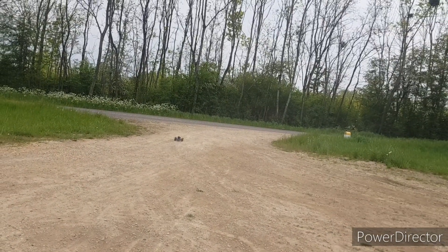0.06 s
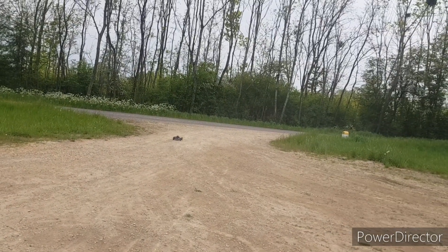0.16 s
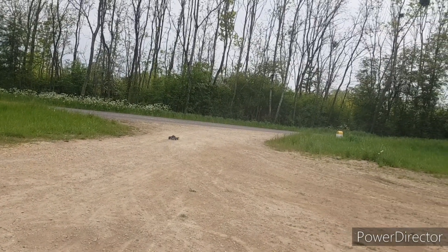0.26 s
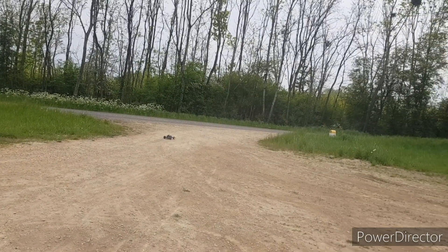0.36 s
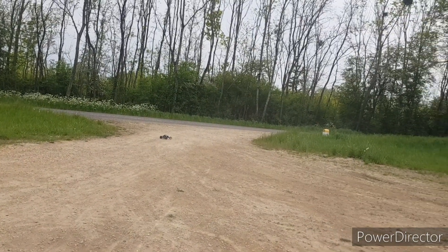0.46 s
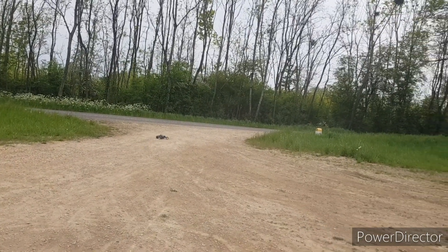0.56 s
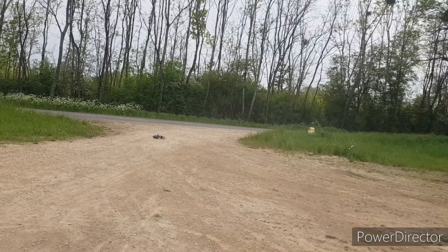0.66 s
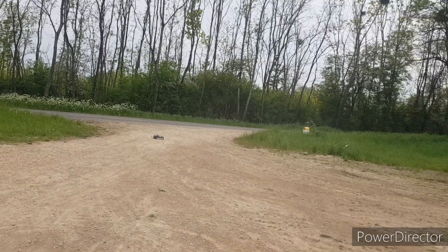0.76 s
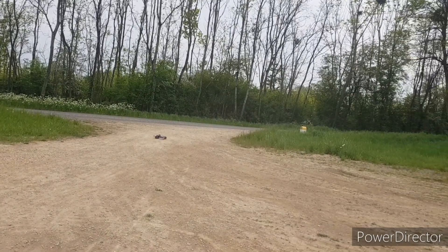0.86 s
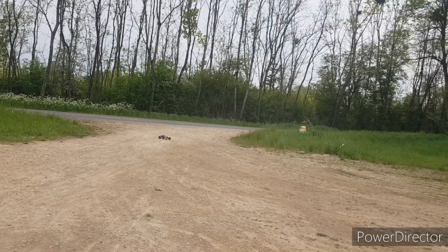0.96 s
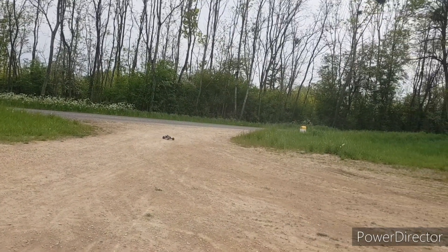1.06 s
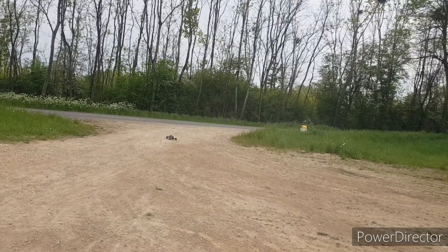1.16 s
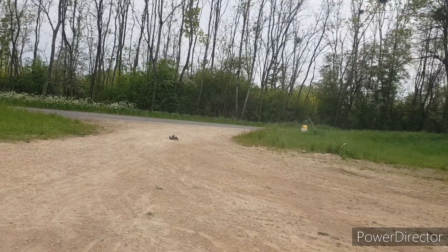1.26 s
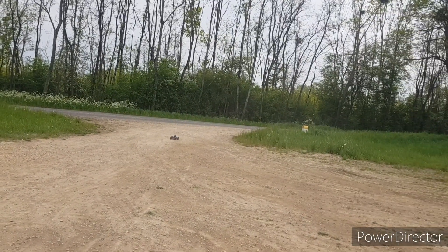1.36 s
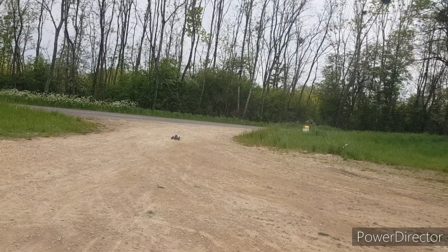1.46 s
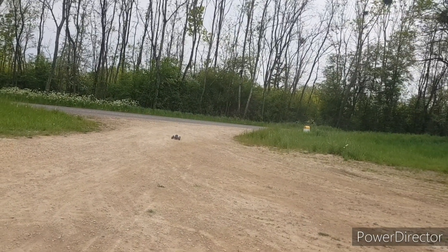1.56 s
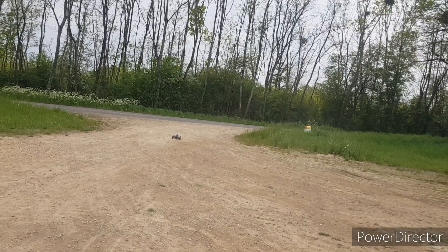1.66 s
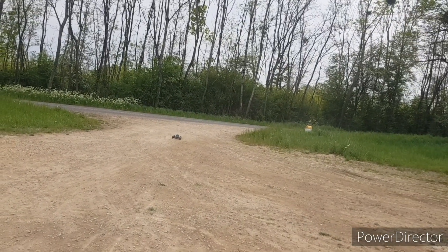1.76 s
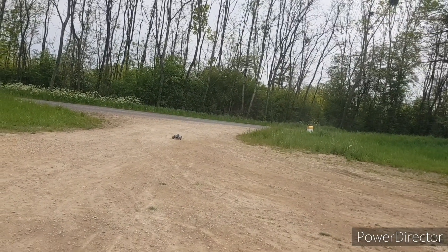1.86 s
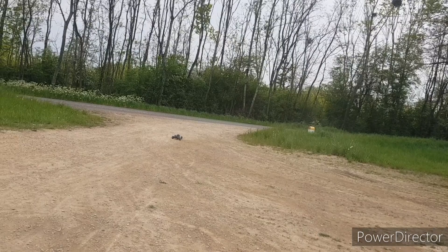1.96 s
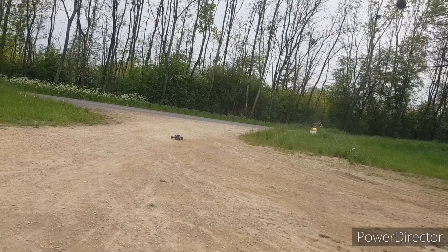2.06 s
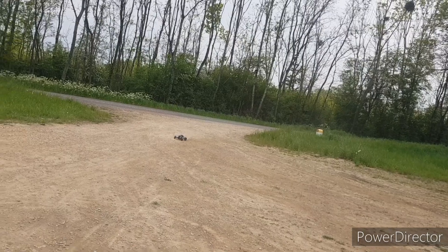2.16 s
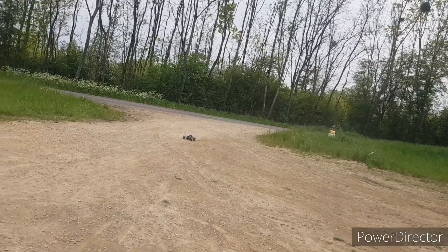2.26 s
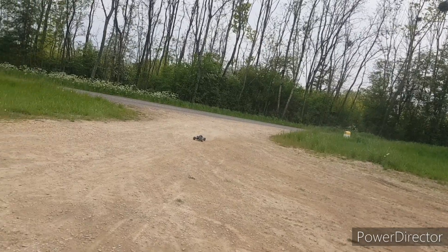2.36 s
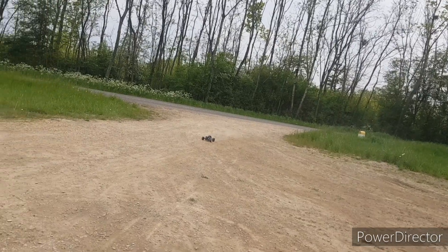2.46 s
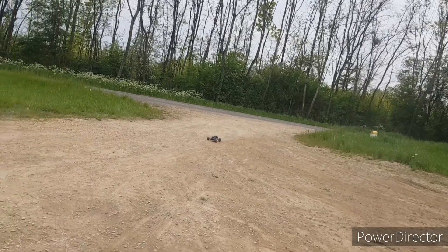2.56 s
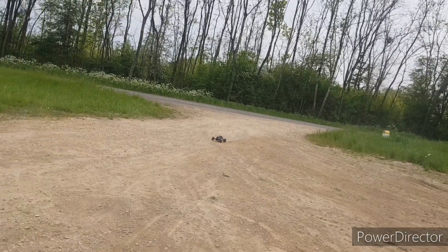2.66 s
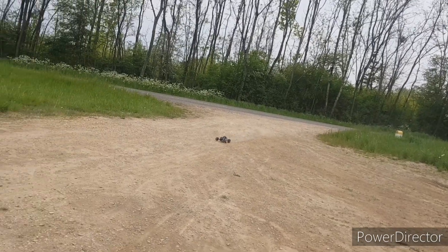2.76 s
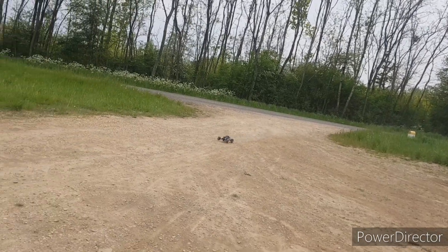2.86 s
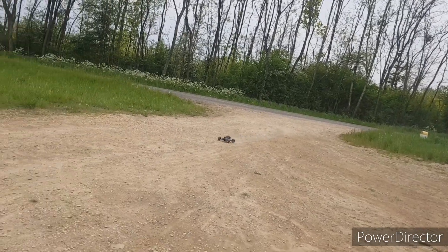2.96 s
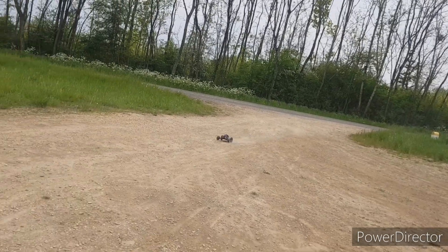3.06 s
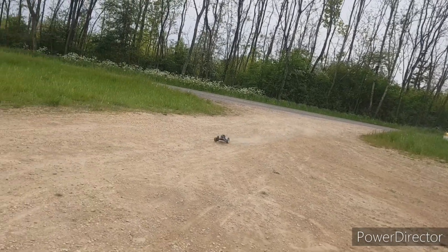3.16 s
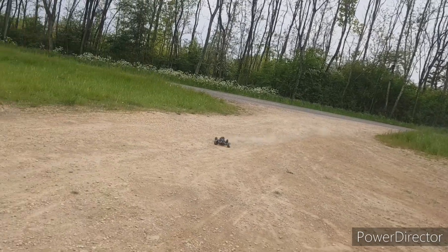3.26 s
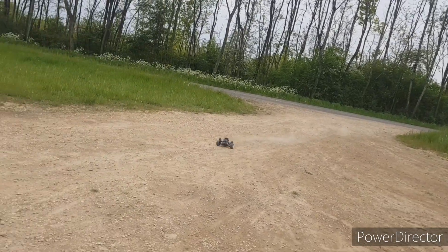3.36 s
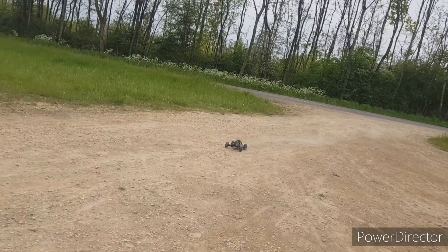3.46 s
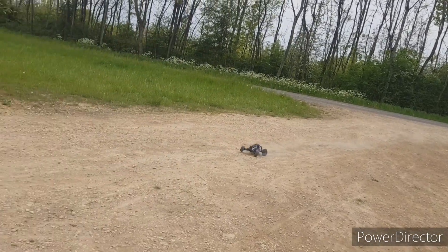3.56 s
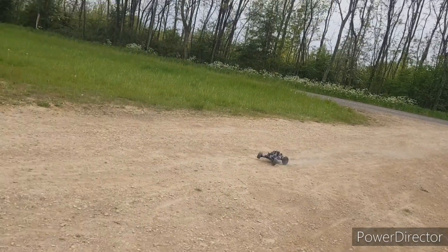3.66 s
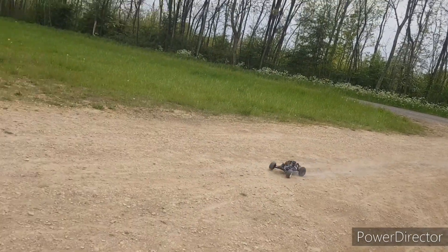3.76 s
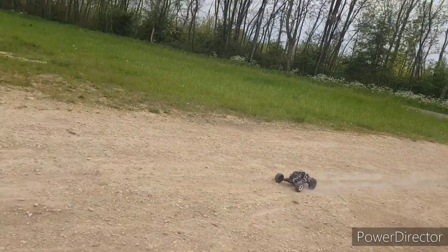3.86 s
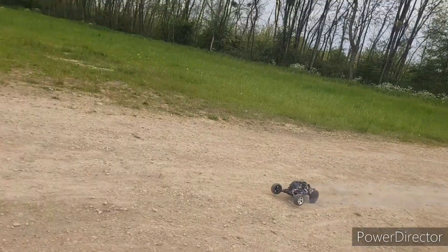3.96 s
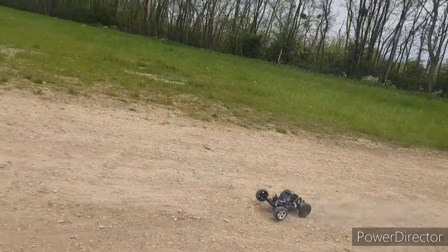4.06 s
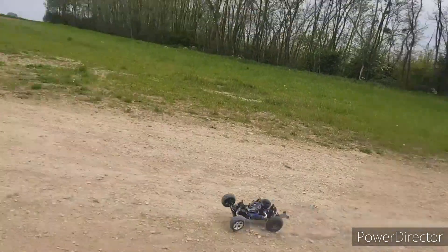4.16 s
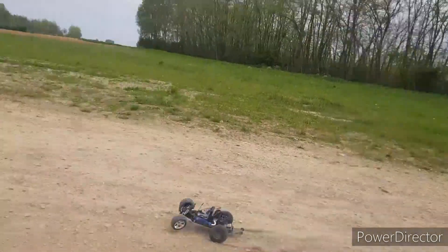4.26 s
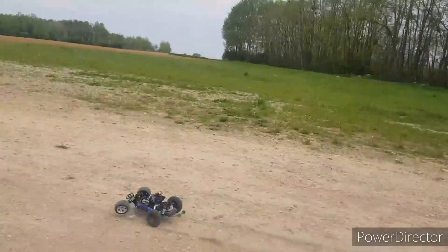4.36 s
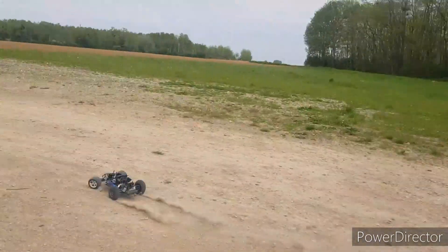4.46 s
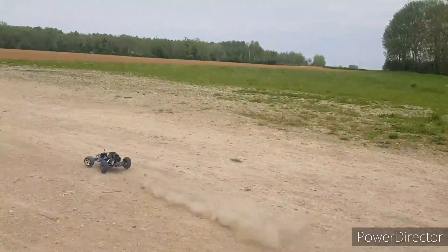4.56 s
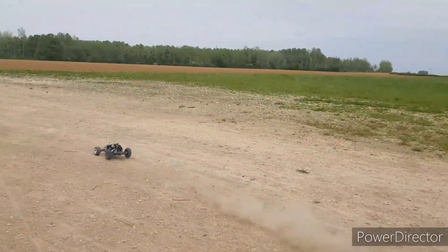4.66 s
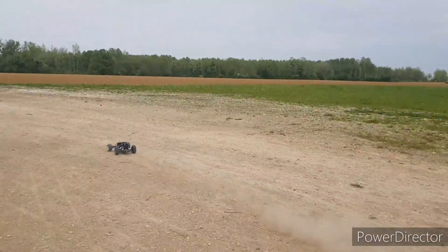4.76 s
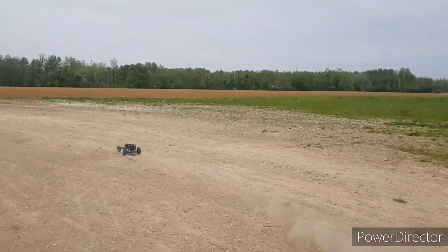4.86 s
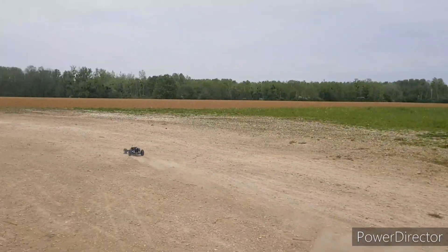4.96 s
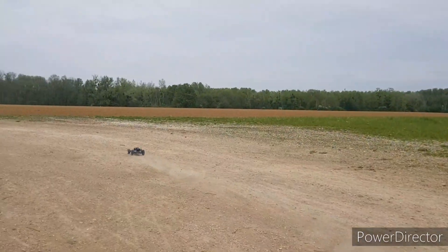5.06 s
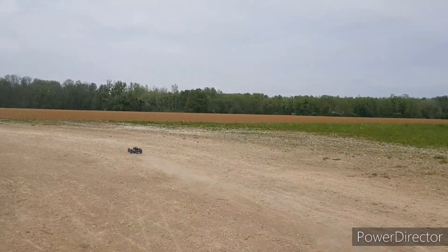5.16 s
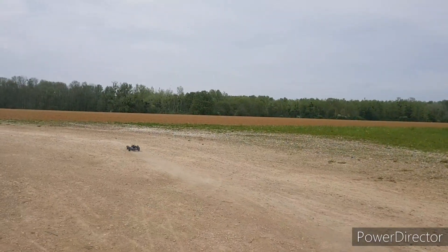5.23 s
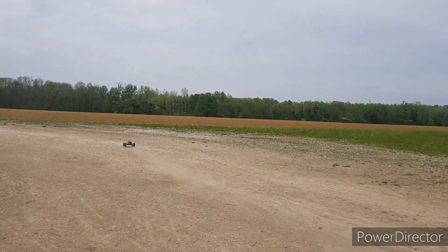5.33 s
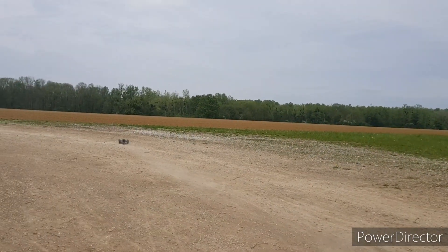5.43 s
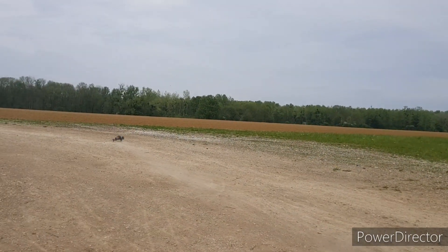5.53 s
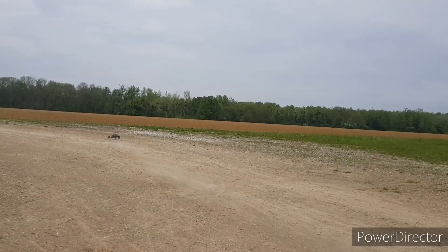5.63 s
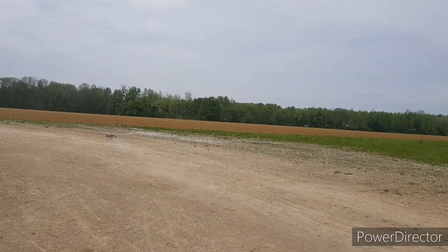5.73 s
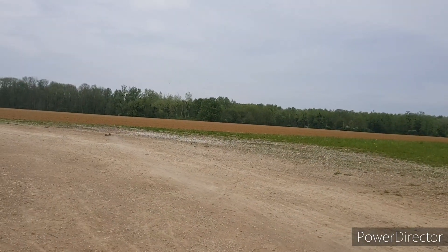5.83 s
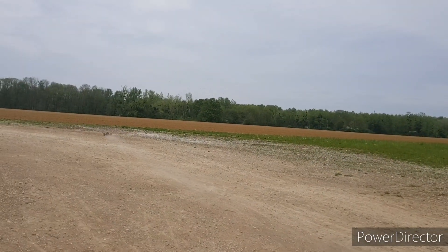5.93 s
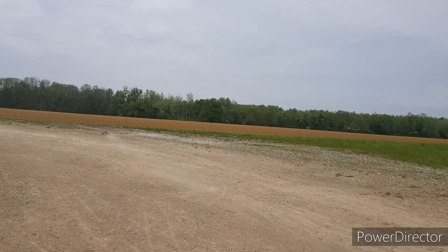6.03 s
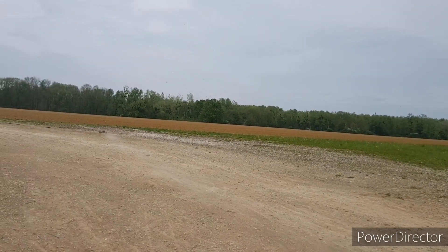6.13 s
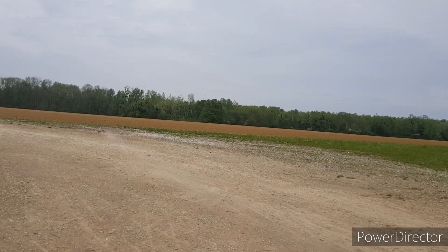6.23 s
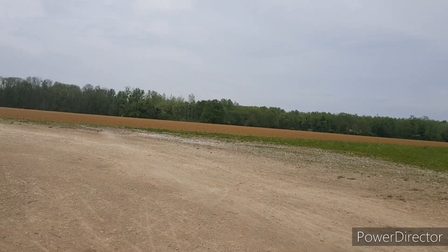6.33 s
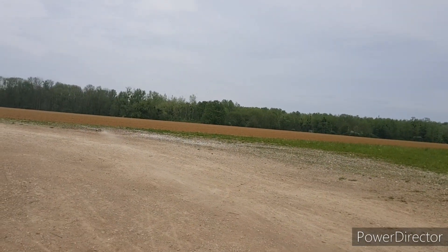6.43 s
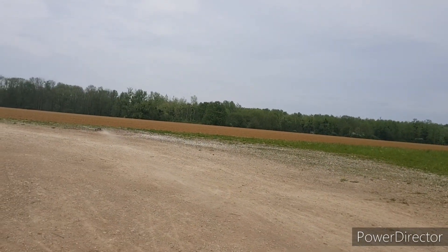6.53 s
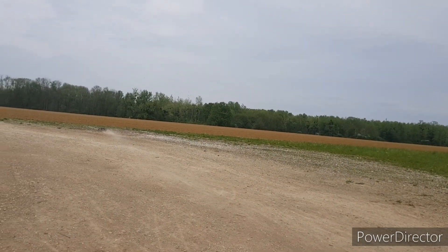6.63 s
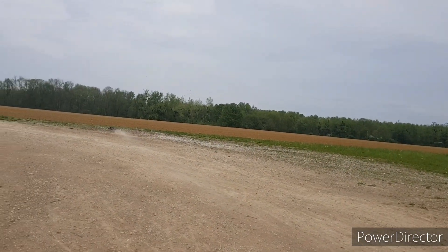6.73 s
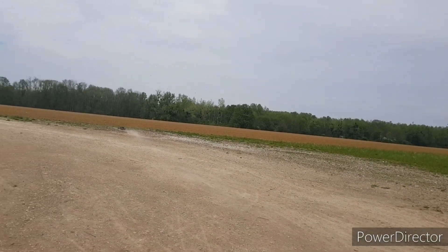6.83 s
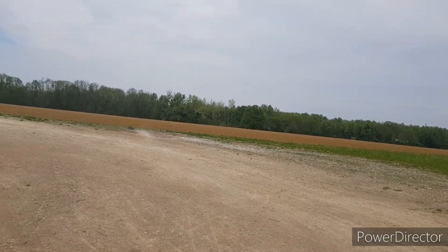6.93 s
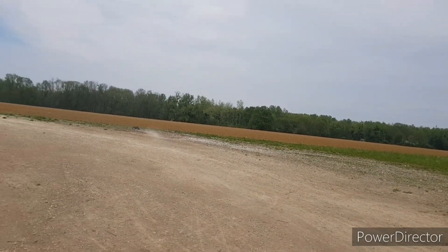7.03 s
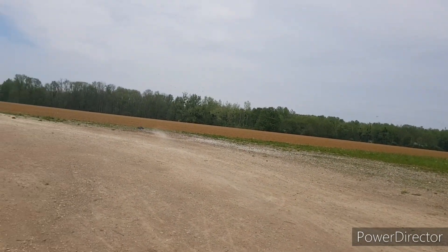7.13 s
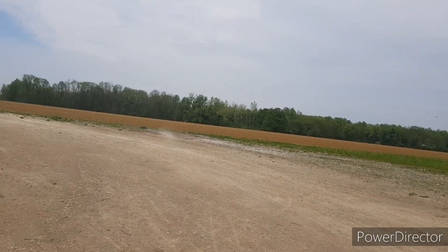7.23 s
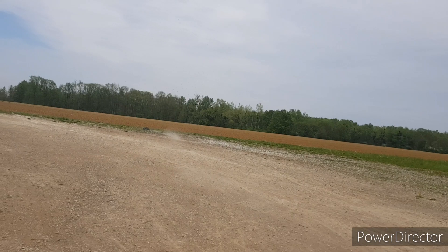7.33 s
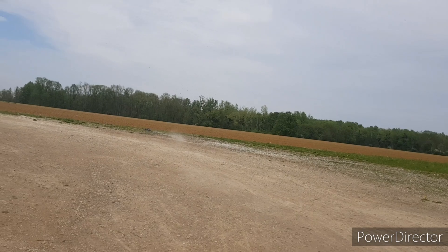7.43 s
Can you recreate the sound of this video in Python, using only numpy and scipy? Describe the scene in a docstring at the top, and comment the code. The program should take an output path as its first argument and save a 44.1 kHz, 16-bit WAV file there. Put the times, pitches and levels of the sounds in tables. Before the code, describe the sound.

A tiny two-stroke engine idles at a distance on open gravel, raspy and hissing, with a few short throttle blips. It then revs hard, its buzzy scream wobbling as wheels slip and bounce, body clattering and thudding as it passes close. It recedes, drops to a faint idle, and grit and small stones tick down near the microphone. Light wind rumbles softly throughout.

```python
"""A small two-stroke model car idles on gravel under light wind, blips its throttle, then races past in bursts.
Each turn of the shaft fires once into a tuned pipe: overtones of the firing rate, with gas hissing in puffs.
On the bursts the wheels slip and bounce, so the speed wobbles; the body clatters and a thin whistle comes and goes.
At last the car idles far off while grit, sand and small stones thrown up by the tyres tick down.
Throughout, the land murmurs and wind rumbles at two microphone ports, which hear the car with unlike delay and colour."""
import sys
import numpy as np
from scipy import signal
from scipy.fft import rfft, irfft
from scipy.io import wavfile
from scipy.ndimage import uniform_filter1d, map_coordinates

SR = 44100
rng = np.random.default_rng(int(sys.argv[2]) if len(sys.argv) > 2 else 0)


def wav_record(signal):
    """Record a signal, one row per channel, as 16-bit PCM in the file named by sys.argv[1]."""
    frames = np.transpose(np.atleast_2d(signal))
    bounded = np.clip(frames, -1, 1)
    # unit amplitude maps onto the largest positive 16-bit level
    quanta = np.round(bounded * 32767).astype(np.int16)
    wavfile.write(sys.argv[1], SR, quanta)


N = 330309
TIME = np.arange(N) / SR  # s
IDLE_HZ = 200  # speed at which the voices have their idle level

# response of each engine voice: (level/dB per octave of speed, level/dB at full throttle, loss/dB when coasting)
THUMP, PIPE = (5.43, 1.7, 14), (11.83, 7.43, 10)
PIPE_END, INTAKE = (8.9, 5.7, 12), (9.9, 7.28, 0.062)

# the car comes and goes: t/s, level of intake and casing at idle/dB, chassis clatter between landings/dB
PASSAGE = [(0, -45.5, -52.5), (.35, -46, -56.5), (.65, -46.5, -55), (.8, -42, -51), (1, -43, -49.5),
           (1.28, -43.5, -50), (1.6, -43, -45.5), (1.83, -42, -47), (2, -38.5, -36.5), (2.18, -43.5, -36),
           (2.28, -43.5, -43.5), (2.48, -45.5, -47), (2.75, -40.5, -43), (3, -41.5, -37),
           (3.25, -43.5, -35.5), (3.4, -38, -36.5), (3.48, -44, -39.5), (3.7, -43, -32.5), (4, -40, -30.5),
           (4.18, -37.5, -31), (4.3, -37.5, -32.5), (4.42, -35, -29.5), (4.55, -39.5, -32),
           (4.66, -37.5, -35.5), (4.74, -41, -48), (4.9, -45, -38), (5.12, -47, -39), (5.25, -45.5, -46),
           (5.38, -47.5, -47.5), (5.5, -51.5, -59.5), (5.6, -49, -51), (5.7, -52.5, -58.5), (6, -53, -56),
           (6.2, -55, -59), (6.4, -58, -63), (6.8, -57.5, -68.5), (7.49, -55, -65.5)]
# wheels landing: t/s, starting level/dB, f/Hz
LANDINGS = [(2.222, -34, 253.4), (3.025, -32, 105.4), (3.197, -28, 209.7), (3.301, -41, 183.9),
            (3.418, -34, 237.8), (3.604, -28, 188), (3.671, -28, 185), (3.817, -37, 241.2),
            (3.991, -35, 180.6), (4.187, -29, 220), (4.276, -37, 198.1), (4.358, -46, 288.4),
            (4.639, -30, 298.6), (4.955, -45, 214.2), (5.014, -46, 259.9), (5.098, -34.5, 217.8)]
# part of pipe and casing that faces the ports: t/s, ring f/Hz, bright band f/Hz, its lift/dB,
# hollow from the ground echo f/Hz, its depth/dB
FACING_PARTS = [(0, 2550, 4000, -1, 3300, -0.5), (.25, 2550, 3600, 4, 3200, 1.5),
                (.5, 2550, 3750, 4, 3200, 2), (.65, 2550, 4200, 1.5, 3300, 1),
                (1.0, 2550, 5200, 6, 3320, 4), (1.6, 2550, 4850, 2, 3302, 1.5),
                (2.0, 2550, 4395, 0, 3273, 1), (2.3, 2310, 4200, -5, 3200, 7),
                (2.45, 2330, 4200, 2, 3270, 7), (2.62, 2425, 4280, 3, 3300, 8),
                (2.82, 2489, 4405, -3, 3350, 2), (2.95, 2694, 5903, 2, 3600, 4),
                (3.15, 2608, 5795, 3, 3706, 2), (3.35, 2391, 4600, 2.5, 3306, 0),
                (3.6, 2607, 5800, 1, 3708, -6), (3.9, 2476, 5754, 5, 3191, 7),
                (4.1, 2480, 5050, 3.5, 3030, 5), (4.22, 2508, 4400, 8, 2988, 6.5),
                (4.35, 2753, 4464, 0.5, 3394, 0.5), (4.43, 2502, 4420, 8, 3296, 0),
                (4.5, 2505, 4750, 5, 2923, 0), (4.58, 2598, 5810, 6, 3295, -0.5),
                (4.75, 2550, 5505, 8, 3030, 1), (4.88, 2597, 4465, 3, 3220, 3),
                (5.0, 2700, 4647, 3, 3390, 4.5), (5.13, 2630, 4500, 3, 3300, 3),
                (5.25, 2583, 5003, 5, 3005, 3), (5.4, 2503, 4405, 3, 3004, -3),
                (5.7, 2550, 4792, 2.5, 3303, 5), (7.49, 2550, 4806, 4.5, 3288, 4.5)]


def gain_of(db):
    """Logarithmic level: decibels to an amplitude factor."""
    return 10 ** (np.asarray(db) / 20)


def evened(x):
    """Power normalisation: scales to a mean square of 1."""
    return x / np.sqrt(np.mean(x ** 2) + 1e-20)


def read(points, hz, axis=1):
    """Linear interpolation of a table column over log frequency."""
    table = np.transpose(points)
    return np.interp(np.log(hz + 1), np.log(table[0] + 1), table[axis])


def curve(rows, t, axis=1):
    """Linear interpolation of a table column over time."""
    table = np.transpose(rows)
    return np.interp(t, table[0], table[axis])


def hump(t, s, half_s):
    """Raised-cosine pulse: a peak of height 1 with rounded top and feet."""
    return np.cos(np.pi / 2 * np.clip((t - s) / half_s, -1, 1)) ** 2


def drift(shape, size):
    """Low-passed noise: smooth chance of spread 1 along the last axis."""
    smoothed = uniform_filter1d(rng.standard_normal(shape), size)
    return evened(uniform_filter1d(smoothed, size))


def reshaped(x, factor):
    """Time-varying filtering: multiplies short-time spectra by factor(Hz column, seconds row)."""
    hz, t, z = signal.stft(x, SR, nperseg=512, noverlap=384)
    return signal.istft(z * factor(hz[:, None], t), SR, nperseg=512, noverlap=384)[1][..., :N]


def coloured(noise, spectrum):
    """Stationary linear filtering: weights the whole spectrum of a noise by a table of levels."""
    return irfft(rfft(noise) * gain_of(read(spectrum, np.fft.rfftfreq(N, 1 / SR))), N)


def field():
    """Stationary filtered noise: the steady low murmur of the open land."""
    # spectrum of the murmur: f/Hz, relative level per Hz/dB
    murmur_spectrum = [(100, -14), (150, 14), (300, 1.5), (450, 0), (800, -6.5), (1500, -41)]
    level_db = -58
    return gain_of(level_db) * evened(coloured(rng.standard_normal(N), murmur_spectrum))


def wind(lumps_db=4.5):
    """Turbulent pressure at a port: low lumpy noise, mostly independent at each."""
    # slow swell: t/s, level/dB
    swell = [(0, -53), (.8, -55), (1.4, -44), (1.85, -55), (2.7, -47), (3.2, -51.5), (3.6, -52), (4.1, -59),
             (4.9, -62.5), (5.6, -65), (6.2, -58.5), (6.4, -61.5), (6.9, -53.5), (7.49, -53.5)]
    # gusts added to the swell: t/s, peak of the added level/dB, half length/s
    puffs = [(1.257, -71, 0.045), (1.583, -45, 0.064), (2.903, -34, 0.062), (4.207, -42, 0.056),
             (4.361, -43, 0.14), (4.644, -46, 0.11), (5.283, -53, 0.06), (5.442, -62, 0.059),
             (6.968, -51, 0.068), (7.26, -47, 0.073)]
    # spectrum of the rumble: f/Hz, relative level per Hz/dB
    rumble_spectrum = [(20, -32), (30, -19), (40, -13), (55, -2), (75, -6.5), (110, -12.5), (170, -17),
                       (300, -24), (500, -68)]
    shared = .4  # amplitude of the part common to both ports
    push = rng.standard_normal((3, N)) * gain_of(lumps_db * drift((3, N), size=2500))
    push = push[:2] + shared * push[2]
    gusts = sum(gain_of(db) * hump(TIME, s, half_s) for s, db, half_s in puffs)
    return evened(coloured(push, rumble_spectrum)) * (gain_of(curve(swell, TIME)) + gusts)


def sand(per_s=110):
    """Shot noise: fine grains patter down as faint ticks of chance size and time, stronger at one port."""
    # peak of the faintest tick at its nearer port: t/s, level/dB
    patter = [(5.3, -70), (5.6, -51), (6.2, -52), (6.7, -59), (7.49, -66)]
    t = np.arange(-12, 24) / SR
    tick = np.exp(-abs(t) / .00007) * np.cos(2 * np.pi * 10500 * t)
    sizes = gain_of(2.69 * np.minimum(rng.exponential(1, (2, N)), 3))
    falls = (rng.random((2, N)) < per_s / SR) * sizes
    both_ports = falls + .5 * falls[::-1]
    return signal.oaconvolve(both_ports, tick[None], "same") * gain_of(curve(patter, TIME))


def grit(cycles=0.34, skitter_db=-9):
    """Impact excitation: each grain is a strongly damped tick followed by a brief decaying skitter."""
    # grains: t/s, peak level/dB, left minus right level/dB, f/Hz, skitter decay time/s (at least 1e-4 s)
    grains = [(5.6062, -32, -8, 7000, .0006), (5.6401, -43, -2, 9000, .0006), (5.6884, -37, -5, 7000, .001),
              (5.852, -37, -4, 9500, .0025), (5.8892, -42, -6, 6500, .002), (5.9197, -40, -6, 8500, .002),
              (5.9795, -36, -6, 10500, .001), (5.9977, -43, -5, 9000, .0006), (6.0791, -38, -7, 6000, .002),
              (6.132, -39, -6, 4500, .001), (6.1649, -37, -2, 7000, .001), (6.1754, -41, -3, 8000, .001),
              (6.2257, -41, -5, 10000, .0015), (6.3344, -43, -3, 9990, .0008),
              (6.3894, -46, -5, 9500, .0006), (6.4882, -48, -3, 9500, .0006), (6.5164, -43, -4, 7510, .001)]
    out, t, after = np.zeros((2, N)), np.arange(-30, 60) / SR, np.arange(500) / SR
    chance = rng.standard_normal((len(grains), len(after)))
    for (s, db, pan_db, hz, skitter_s), jumps in zip(grains, chance):
        tick = np.exp(-abs(t) * hz / cycles) * np.cos(2 * np.pi * hz * t)
        skitter = gain_of(skitter_db) * jumps * np.exp(-after / max(skitter_s, 1e-4))
        grain = np.convolve((after == 0) + skitter, tick)
        pan = gain_of([[pan_db / 2], [-pan_db / 2]])
        sound = gain_of(db) * grain / abs(grain).max() * pan
        at = round((s + t[0]) * SR)
        out[:, at:at + sound.shape[1]] += sound
    return out


def thuds(rows, t60, rise_s):
    """Free decay of a struck mode: one exponentially damped tone for each impact."""
    out, t = np.zeros(N), np.arange(4000) / SR
    for s, db, hz in rows:
        thud = gain_of(db - 60 * t / t60) * np.sin(2 * np.pi * hz * t) * np.minimum(t / rise_s, 1)
        out[round(s * SR):round(s * SR) + len(t)] += thud
    return out


def stones():
    """Impact resonance: larger stones drop with short, quickly damped tones."""
    # stones dropping: t/s, starting level/dB, f/Hz
    drops = [(5.588, -35, 540), (6.016, -46, 720.4), (6.118, -43, 751), (6.286, -45, 649),
             (6.366, -42, 650), (6.42, -43, 701)]
    return thuds(drops, t60=0.022, rise_s=0.0009)


def landings():
    """Impact resonance: wheels meet the ground with longer, low damped tones."""
    return thuds(LANDINGS, t60=0.068, rise_s=0.002)


def chassis():
    """Random impact excitation: plastic body and wheels knock over the gravel, in lumps."""
    # spectrum of the clatter: f/Hz, relative level per Hz/dB
    clatter_spectrum = [(60, -49), (150, 0.5), (250, -6), (400, -5), (650, 6.5), (1000, -3), (1500, -4),
                        (1900, -1), (2600, -57)]
    bumps_db, knock_db = 1.8, 2.5  # spread of the lumps and of the knocks
    kick_db, kick_s = 3.5, 0.018  # each landing rattles the body: rise in level, half length
    lumps = gain_of(bumps_db * drift(N, size=700)) * rng.standard_normal(N)

    def colour(hz, t):
        """Spectral weighting: short hollow knocks of chance pitch upon the clatter spectrum."""
        knocks = evened(uniform_filter1d(drift((len(hz), len(t)), size=5), size=3, axis=0))
        return gain_of(read(clatter_spectrum, hz) + knock_db * knocks)

    kicks = sum(hump(TIME, row[0], kick_s) for row in LANDINGS)
    level_db = curve(PASSAGE, TIME, axis=2) + kick_db * kicks
    return evened(reshaped(lumps, colour)) * gain_of(level_db)


def whistle(waver_hz=39.0):
    """Frequency modulation: chance wavering makes a high tone fuzzy, perhaps the clutch at part throttle."""
    # the tone: t/s, mean f/Hz, level/dB
    tone = [(1.15, 10630, -85), (1.22, 10860, -60), (1.5, 10800, -59), (1.8, 11090, -64),
            (1.95, 11200, -85), (2.3, 10600, -83), (2.42, 10990, -54), (2.6, 11290, -70),
            (2.85, 11320, -53), (2.95, 11650, -85)]
    turns = np.cumsum(curve(tone, TIME) + waver_hz * drift(N, size=300)) / SR
    return np.sqrt(2) * gain_of(curve(tone, TIME, axis=2)) * np.sin(2 * np.pi * turns)


def speed_at(t):
    """Load on a rotating shaft: firing rate in Hz, with jolts from the wheels."""
    # engine speed before the jolts, one firing a turn: t/s, f/Hz
    speeds = [(0.0, 199.1), (0.356, 195.1), (0.378, 198), (0.608, 193.3), (0.65, 196.8), (0.738, 195.8),
              (0.82, 249.8), (0.857, 246.8), (0.917, 204.9), (1.104, 191.3), (1.162, 188.4), (1.215, 230),
              (1.272, 224), (1.33, 200), (1.454, 223), (1.816, 228.1), (1.889, 295.1), (1.968, 320.6),
              (2.041, 398.8), (2.097, 418.7), (2.152, 391.3), (2.219, 259.8), (2.306, 196), (2.36, 226),
              (2.392, 235.6), (2.452, 233.3), (2.508, 224.2), (2.576, 249.5), (2.62, 258.9), (2.7, 254.7),
              (2.85, 260.1), (2.878, 309.4), (2.946, 335), (3.022, 456.3), (3.077, 431.7), (3.105, 355.4),
              (3.139, 351.2), (3.204, 367), (3.245, 422.8), (3.285, 418.6), (3.362, 335), (3.45, 203.8),
              (3.498, 227.6), (3.534, 322.4), (3.555, 328.4), (3.6, 379.2), (3.666, 481.5), (3.776, 439.5),
              (3.804, 426.3), (3.826, 472.7), (3.876, 501.5), (3.93, 467.7), (3.954, 468), (3.978, 512),
              (4.01, 490.6), (4.04, 428), (4.072, 499.3), (4.1, 512), (4.126, 510.3), (4.166, 428.8),
              (4.19, 361.3), (4.206, 388), (4.246, 485.3), (4.276, 517), (4.302, 497.5), (4.348, 570.6),
              (4.362, 568.6), (4.382, 505.4), (4.404, 490), (4.436, 436), (4.478, 493), (4.51, 507),
              (4.55, 568.6), (4.572, 527.4), (4.588, 466), (4.612, 436), (4.66, 287), (4.764, 257.8),
              (4.797, 282.8), (4.839, 373.7), (4.876, 388), (4.903, 439.6), (4.961, 473), (4.99, 445),
              (5.016, 462), (5.034, 457), (5.064, 494), (5.1, 432), (5.134, 434), (5.196, 417.2),
              (5.281, 338), (5.401, 283.7), (5.461, 233.8), (5.535, 197.9), (5.68, 198.6), (5.966, 194),
              (6.04, 198.6), (6.136, 193.9), (6.468, 199.2), (6.506, 195), (6.54, 198.3), (7.38, 200.4),
              (7.49, 202.4)]
    # tyres bite and drag the engine down, or spin free and let it flare: t/s, change of f/Hz, half length/s
    jolts = [(2.759, 26.5, 0.037), (3.049, -80, 0.026), (3.693, -95, 0.025), (3.749, -45, 0.024),
             (4.931, -96, 0.024)]
    return curve(speeds, t) + sum(hz * hump(t, s, half_s) for s, hz, half_s in jolts)


def trigger(t):
    """Engine load: throttle opening, and how far it coasts fast with throttle shut, both 0-1."""
    # throttle pulls: pulled t/s, let go t/s, opening 0-1
    pulls = [(0.735, 0.843, 0.3), (1.168, 1.238, 0.35), (1.35, 1.812, 0.01), (1.83, 2.125, 0.39),
             (2.31, 2.837, 0.38), (2.847, 3.244, 0.97), (3.479, 4.563, 0.96), (4.77, 5.131, 0.99)]
    open_s, shut_s, overrun_oct = 0.05, 0.061, 0.51  # overrun: octaves above idle for full coasting
    held = [np.clip(np.minimum((t - on) / open_s, 1 - (t - off) / shut_s), 0, 1) for on, off, _ in pulls]
    opening = sum(h * row[2] for h, row in zip(held, pulls))
    fast = np.clip(np.log2(speed_at(t) / IDLE_HZ) / overrun_oct, 0, 1)
    return opening, fast * np.clip(1 - sum(held), 0, 1)


def loudness(t, voice, aspect_db=0):
    """Source strength: gain of one engine voice from distance, aspect, speed and throttle."""
    rev_db, open_db, coast_db = voice
    opening, coast = trigger(t)
    answer_db = rev_db * np.log2(speed_at(t) / IDLE_HZ) + open_db * opening - coast_db * coast
    return gain_of(curve(PASSAGE, t) + aspect_db + answer_db)


def lock(t):
    """Periodicity: share of intake and casing power in overtones, set by speed, less when coasting."""
    # noise of intake and casing locks to the firings: speed f/Hz, share of power in overtones unless coasting
    locked_share = [(200, .4), (225, .58), (255, .74), (300, .86), (430, .86), (510, .84)]
    coast_loss = .18  # share of these overtones lost when fully coasting
    return read(locked_share, speed_at(t)) * np.clip(1 - coast_loss * trigger(t)[1], 0, 1)


def shaft():
    """Rotational inertia: the flywheel rounds speed changes, yet no two burns are alike; gives turns so far."""
    speed = speed_at(TIME)
    above_idle = np.clip((speed - 205) / 20, 0, 1)
    unevenness = .0026 + .0012 * above_idle + .0025 * trigger(TIME)[0] ** 2  # relative spread of speed
    hz = uniform_filter1d(speed, size=300)
    return np.cumsum(hz * (1 + unevenness * drift(N, size=300))) / SR


def gas(turns, steady=1.0, puff=0.15):
    """Modulated flow noise: rushing gas hisses in a puff each turn; two independent draws."""
    # spectrum of the gas: f/Hz, relative level per Hz/dB
    hiss_spectrum = [(1200, -23), (1900, -16.5), (2200, 0), (2600, 0.5), (3300, 2.5), (4200, 3),
                     (4550, 2.5), (4900, 4.5), (5300, 3.5), (5750, 3.5), (7000, -4.5), (9000, -11.5),
                     (11500, -4.5), (13000, -10), (16000, -16.5)]
    # relative treble, in full from 8 kHz and none below 5 kHz: t/s, level/dB
    treble = [(0, -9), (1, -4), (1.8, -4), (2.5, -2), (3.3, 0), (4, 4), (4.5, 1), (5.2, 0), (6, -0.5),
              (6.7, 1.5), (7.49, 8.5)]
    patchy_db, flicker_db = 1.5, .6  # spread of the patches, and of the flicker
    puffs = (steady + np.exp(-(turns % 1) / puff)) * rng.standard_normal((2, N))

    def colour(hz, t):
        """Spectral weighting: drifting patches and a shared flicker upon the gas spectrum."""
        patches = evened(uniform_filter1d(drift((len(hz), len(t)), size=28), size=3, axis=0))
        top_db = curve(treble, t) * np.clip((hz - 5000) / 3000, 0, 1)
        moving_db = patchy_db * patches + flicker_db * drift(len(t), size=4)
        return gain_of(read(hiss_spectrum, hz) + top_db + moving_db)

    def unlocked(hz, t):
        """Power sharing: takes out the share of noise that the overtones stand for."""
        return np.sqrt(1 - lock(t) * (hz > 2100) * np.clip((9000 - hz) / 2500, 0, 1))

    hiss = reshaped(puffs, colour)
    hiss = hiss / np.sqrt(uniform_filter1d((hiss ** 2).mean(0), size=8000))
    return reshaped(hiss, unlocked) * loudness(TIME, INTAKE)


def firings(turns, rasp_db=-4.5):
    """Fourier synthesis: overtones of the firing rate shaped by pipe and casing, each drifting."""
    # pipe spectrum: f/Hz, relative level an overtone/dB
    bark_body = [(250, -44), (400, 2), (600, 5.5), (800, 6), (1050, -3), (1400, 1.5), (1750, 1.5),
                 (2050, -15.5), (2300, -34)]
    # intake and casing spectrum: f/Hz, relative level an overtone/dB
    rasp_body = [(2600, -77), (3050, 3.5), (3650, 0.5), (4350, 7.5), (4700, 3), (5000, 3.5), (5350, -0.5),
                 (5750, 5.5), (6500, -7), (7500, -7.5), (9500, -15)]
    # pipe-end resonance, before it shifts with facing: f/Hz, relative level an overtone/dB
    ring_body = [(1800, -59), (2150, 2.5), (2550, 14), (2900, -4), (3300, -30)]
    # the pipe points another way as the car turns: t/s, bark tilt/dB per octave, rasp tilt/dB per octave,
    # levels over the intake: thump/dB, bark/dB, ring/dB
    aspect = [(0, -0.5, -21, -2.5, -4.5, -8.5), (.6, 0, 0, -5, -3, -19), (.83, 1, -29, -4, -5, -11),
              (1.1, -2.5, -8, -0.5, -4.5, -9.5), (1.3, -0.5, 6, 2.5, -5.5, -6.5),
              (1.6, -2, 4, 3, -1.5, -9.5), (1.85, 3, 2, 4.5, -2, -1.5), (2.0, 6.5, 1.5, -3, -10, -4),
              (2.3, 1.5, 2, 2, -2.5, -4.5), (2.5, -3, 1, 6.5, -2, -4), (2.7, -3, 8, 2, -3, -9),
              (3.0, 6, 0, 2, -4.5, -3.5), (3.14, -3, 2, 1.5, -5, -6), (3.25, 9.5, 2, 1, -5.5, 0),
              (3.31, 11, 4, 1, -3, 9), (3.38, 2, -6, 6, -11, -4), (3.6, 6.5, -3, 6, -1, 2.5),
              (3.78, 1, 8, 5.5, -3.5, 1.5), (3.9, -8.5, 6, 7, -5.5, -2), (4.15, -7.5, -1, 2, -7.5, -1.5),
              (4.24, 11.5, -6, 1.5, -7, -12), (4.35, 6, 2, 5, -11, -4), (4.45, -7, -1, 0, -19.5, -14.5),
              (4.55, 12, 9.5, 3, -14.5, -10), (4.74, 5, 1, 0.5, -9, -18), (4.9, 0, 5, -13, -9.5, -8),
              (4.97, 1, 12, -2, -10.5, -12.5), (5.07, -1, 12, -2, -12, -11.5), (5.2, 1, -3, -8, -7, 2.5),
              (5.4, 9.5, -7, 2, -7, -14), (5.6, -1, -9, -5.5, -6.5, -16), (6.5, -7, -5, 1.5, -6, -28),
              (7.49, -7.5, 22, 5, -7, -11.5)]
    # overtones the pipe favours at a settled idle, second to eleventh: relative level/dB
    idle_tone_db = [-4, 1, -5, 3.5, 3.7, 1.7, -2.5, -2.5, -10, 18]
    # as the car passes close, the pops grow less sharp: t/s, overtones over which the step is lost
    in_step = [(0, 6), (3.7, 5), (4.0, 3.5), (4.3, 2), (7.49, 2)]
    # at low engine speed higher overtones arrive later in each pulse: speed f/Hz, pulse phase/rad,
    # sweep/rad per overtone squared
    sweep = [(200, 1.2, .25), (225, -.1, .4), (260, -.8, .45), (340, -.6, .08), (480, .4, 0)]
    drift_db, rough_db = 1.2, 2.2  # below 2 kHz: slow drift, and break-up in hard burns
    comb_db, flutter_db = 2.0, 2.4  # above 2 kHz: echo peaks, and break-up
    smear = .08  # phase spread/rad, growing with the root of the overtone count
    hop = 128  # samples between control values

    t = np.arange(N // hop + 2) * hop / SR
    order = np.arange(2, 46)[:, None]
    speed = speed_at(t)
    hz = order * speed
    settled = np.clip((210 - np.maximum(speed, uniform_filter1d(speed, size=70))) / 6, 0, 1)
    favoured_db = np.pad(idle_tone_db, (0, len(order) - len(idle_tone_db)))[:, None]
    stands_out = gain_of(favoured_db * settled)

    bark = loudness(t, PIPE, curve(aspect, t, axis=4))
    ring = loudness(t, PIPE_END, curve(aspect, t, axis=5))
    rasp = loudness(t, INTAKE, rasp_db) * np.sqrt(lock(t))
    ring_shift = 2550 / curve(FACING_PARTS, t)  # the ring table is centred on 2550 Hz
    voices = [(bark, bark_body, curve(aspect, t), 1),
              (ring, ring_body, 0, ring_shift),
              (rasp, rasp_body, curve(aspect, t, axis=2), 1)]
    size = 0
    for level, body, tilt_db, shift in voices:
        shape = gain_of(read(body, hz * shift) + tilt_db * np.log2(hz / 1000)) * stands_out * (hz < 9500)
        size = size + level * shape / np.linalg.norm(shape, axis=0)

    # echoes off the ground: slow chance peaks and dips, on a grid of 200 Hz
    comb = drift((50, len(t)), size=70)
    comb = evened(map_coordinates(comb, [hz / 200, np.arange(len(t)) + 0 * hz], order=1, mode="nearest"))
    high_db = comb_db * comb + flutter_db * drift(hz.shape, size=6)
    rough = trigger(t)[0] * drift(hz.shape, size=4)
    low_db = drift_db * drift(hz.shape, size=25) + rough_db * rough
    size = size * gain_of(np.where(hz < 2000, low_db, high_db))
    size = np.vstack([loudness(t, THUMP, curve(aspect, t, axis=3)), size])  # the thump is the firing rate itself

    # low overtones stay in step, making a sharp pulse; upper ones start at chance phases
    count = np.arange(len(size))[:, None]
    slip = smear * np.sqrt(count) * drift(size.shape, size=40)
    lost_step = np.clip((count - 4) / curve(in_step, t), 0, 1)
    slip = slip + lost_step * rng.uniform(-np.pi, np.pi, count.shape)
    low = np.minimum(count + 1, 8)
    slip = slip + read(sweep, speed) - read(sweep, speed, axis=2) * low * (low - 6)

    out = np.zeros(N)
    for k in range(len(size)):
        cycle = np.cos(2 * np.pi * (k + 1) * turns + np.interp(TIME, t, slip[k]))
        out += np.interp(TIME, t, size[k]) * cycle
    return np.sqrt(2) * out


def facing(hz, t):
    """Directivity: gain of bright band, flanks of the ring and ground-echo hollows as the car turns."""
    # bands beside the ring: t/s, well below it/dB, just below it/dB, above it/dB
    flanks = [(0, -0.5, -2, -3), (.8, 1.5, -2, 0.5), (1.2, 5, 3, 2.5), (1.7, -9, -4, 0.5), (2.05, 9, -5, 1),
              (2.3, -4, 5, 6), (2.6, 3.5, -2, 8), (2.85, -1, -3, 4.5), (3.0, -1.5, 4, 2),
              (3.18, 8.5, 2, 4.5), (3.26, -1, -4, 3), (3.315, 9, 8, 5), (3.4, 2, -8, -4),
              (3.6, -4.5, 1.5, 2.5), (3.8, -2.5, 4, 0.5), (4.0, 0.5, -0.5, -22), (4.2, -8, 2.5, -3),
              (4.28, -9, -8, 0), (4.35, -7, 6.5, -6), (4.42, -3, 12, 5), (4.5, 4, 9, 3), (4.58, 0, 1, 2),
              (4.7, 10, -2, 0.5), (4.85, 0, -4, -3), (5.0, 6.5, -11, -0.5), (5.13, 5, 0, -1),
              (5.25, 3, -2, -3), (5.6, 0, -1, 1.5), (6.2, -2.5, -5, 0), (7.49, 2, -7, 3)]
    flank_hz, flank_oct = [1340, 1750, 2990], 0.1
    bright_oct, hollow_oct = 0.071, 0.083  # bell widths
    next_hollow, next_share = 1.53, 0.41  # second hollow: frequency ratio, share of the depth in dB

    def bell(centre_hz, width):
        return np.exp(-.5 * (np.log2((hz + 1) / centre_hz) / width) ** 2)

    lift_db = curve(FACING_PARTS, t, axis=3) * bell(curve(FACING_PARTS, t, axis=2), bright_oct)
    for k, centre_hz in enumerate(flank_hz):
        lift_db = lift_db + curve(flanks, t, axis=k + 1) * bell(centre_hz, flank_oct)
    hollow_hz = curve(FACING_PARTS, t, axis=4)
    hollows = bell(hollow_hz, hollow_oct) + next_share * bell(next_hollow * hollow_hz, hollow_oct / 2)
    return gain_of(lift_db - curve(FACING_PARTS, t, axis=5) * hollows)


def engine():
    """Superposition: periodic firings and gas hiss, both shaped by how the car faces the ports."""
    turns = shaft()
    hiss = gas(turns)
    return reshaped(np.array([firings(turns) + hiss[0], hiss[1]]), facing)


def ports(direct, scattered):
    """Time difference and coherence: each port has its own colour; scattered sound sets them apart."""
    # bearing of the car: t/s, head start of the left port/microseconds before the share below
    bearing = [(0.0, 76), (1.08, 86), (1.7, 59), (2.22, 24), (2.51, -13), (3.47, -29.5), (3.85, -97),
               (4.17, -112), (4.47, 55), (4.62, 107), (5.36, 91), (5.64, 139), (6.55, 123), (7.17, 79),
               (7.5, 66)]
    # the ports: f/Hz, left minus right level/dB, left phase lead/rad, share of the bearing delay, likeness 0-1
    port_response = [(91.5, -1.5, 0, 1, 0.74), (200, 0.5, -1.5, 0.58, 0.97), (373, 1, 0.9, 0.98, 0.94),
                     (570, 2.5, 0.02, 0, 0.95), (840, -3.5, 0.5, 0.56, 0.3), (1444, 1, 0.82, 0.41, 0.23),
                     (2123, 1.5, 4, 0.77, 0.43), (2047, -3, 3.5, 0.6, 1), (2604, -1, 5.5, 0.88, 0.61),
                     (3600, -3.5, 5.5, 0.91, 0.38), (5200, -11, 5.5, 0.75, 0.58), (6000, -10, 7, 1, 0.49),
                     (8740, -0.5, 5.5, 0.95, 1), (10800, -8, 6.5, 0.94, 0.28), (15400, 3.5, 7, 1, 1)]

    def pair(hz, t):
        """Complex transfer: gain and phase of left and right, power kept."""
        delay_s = curve(bearing, t) * 1e-6 * read(port_response, hz, axis=3)
        lead = read(port_response, hz, axis=2) + 2 * np.pi * hz * delay_s
        left = gain_of(read(port_response, hz)) * np.exp(1j * lead)
        return np.array([left, np.ones_like(left)]) * np.sqrt(2 / (1 + abs(left) ** 2))

    def unlike(hz, t):
        """Coherence: gain of the scattered sound that gives the wanted likeness."""
        same = np.clip(read(port_response, hz, axis=4), 0, 1)
        return np.sqrt((1 - same) / (1 + same))

    apart = reshaped(scattered, unlike)
    return reshaped(np.array([direct + apart, direct - apart]), pair)


def scene():
    """Superposition: car, stones and land pass through the ports; grit, sand and wind are right at them."""
    direct, scattered = engine()
    through_ports = direct + chassis() + landings() + stones() + whistle() + field()
    return ports(through_ports, scattered) + grit() + sand() + wind()


def record(dry):
    """Saturation and band limiting: the preamplifier rounds off the highest peaks, then a low-pass."""
    ceiling, edge_hz = .93, 15850
    rounded = dry / (1 + (abs(dry) / ceiling) ** 4) ** .25
    low_pass = signal.firwin(511, edge_hz, window=("kaiser", 9), fs=SR)
    return signal.oaconvolve(rounded, low_pass[None], "same")


dry = scene()
out = record(dry)
wav_record(out)
```